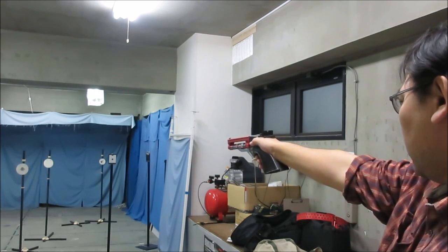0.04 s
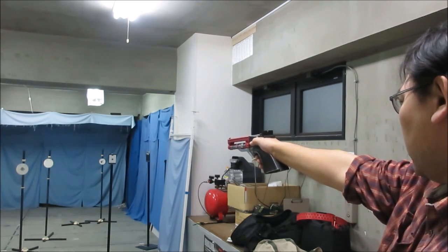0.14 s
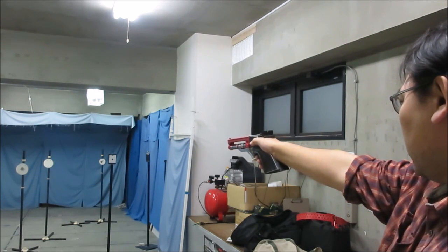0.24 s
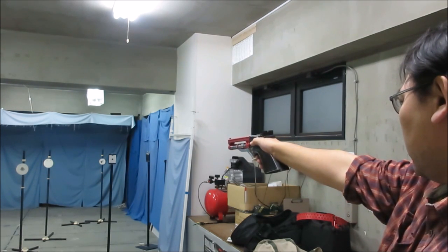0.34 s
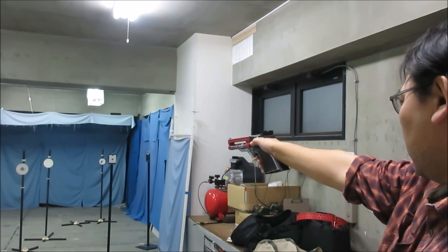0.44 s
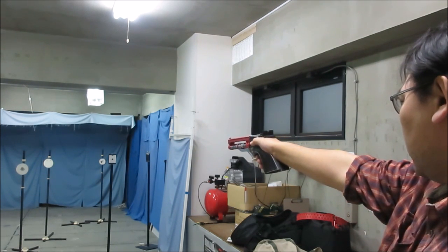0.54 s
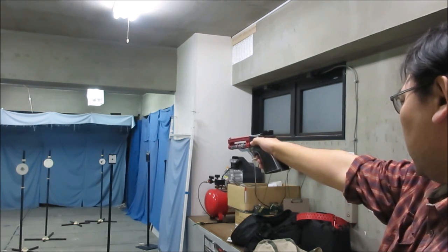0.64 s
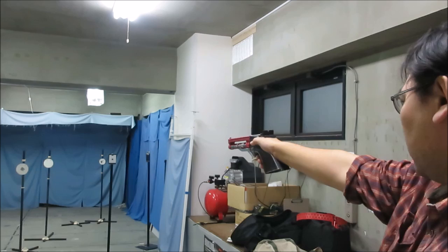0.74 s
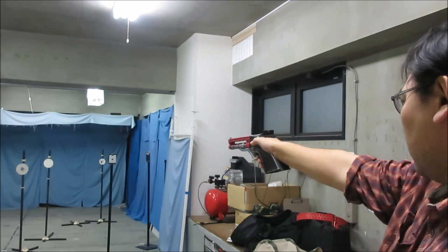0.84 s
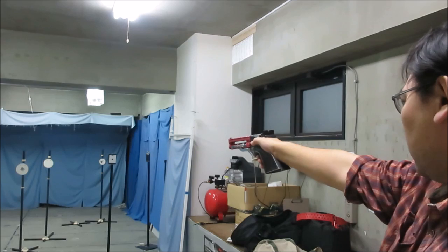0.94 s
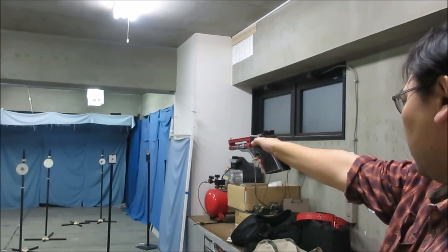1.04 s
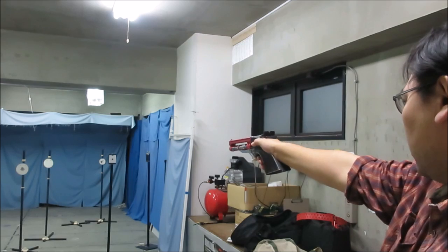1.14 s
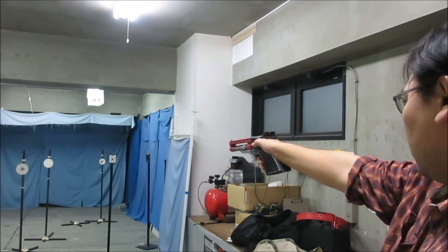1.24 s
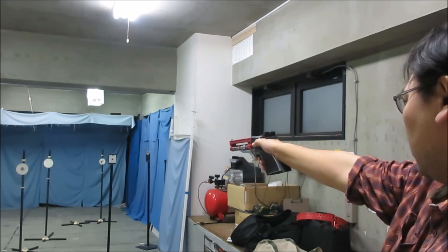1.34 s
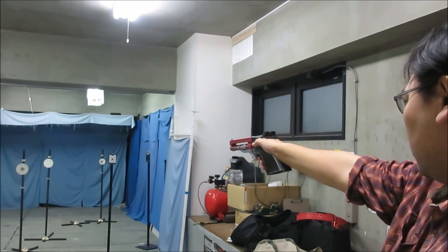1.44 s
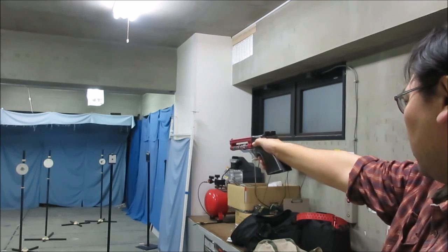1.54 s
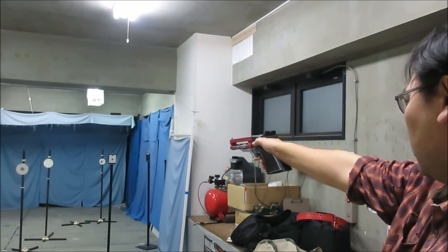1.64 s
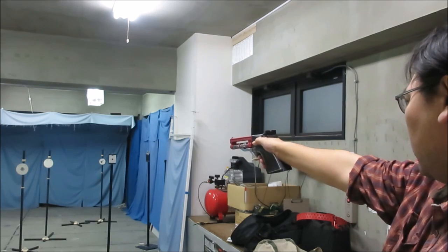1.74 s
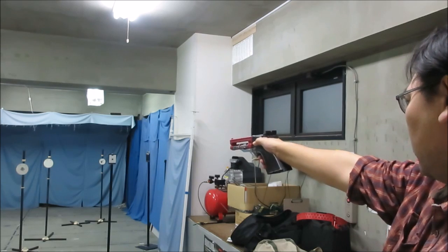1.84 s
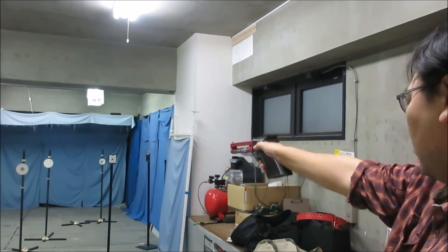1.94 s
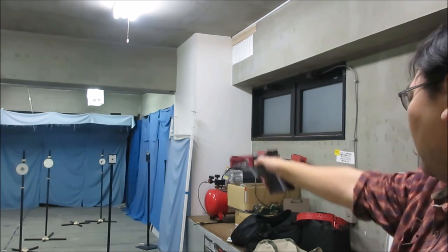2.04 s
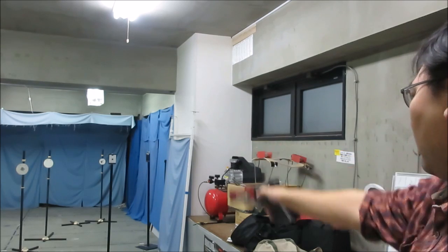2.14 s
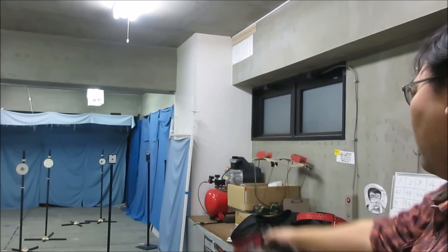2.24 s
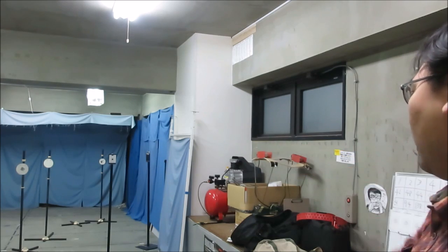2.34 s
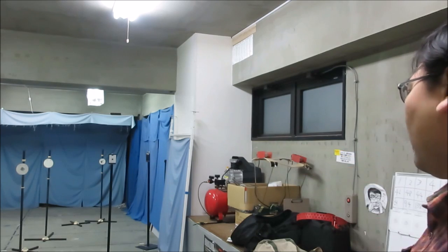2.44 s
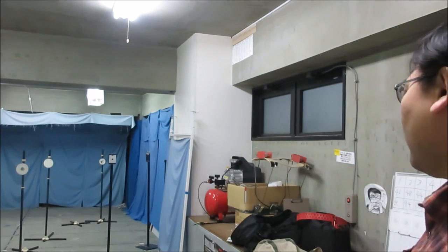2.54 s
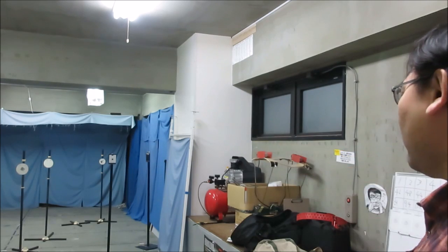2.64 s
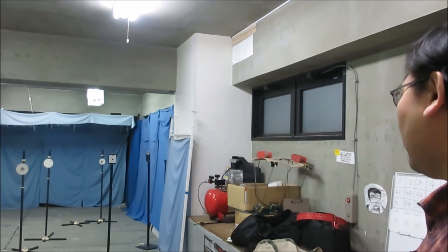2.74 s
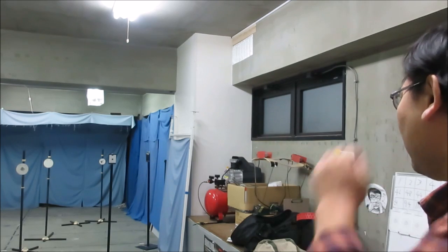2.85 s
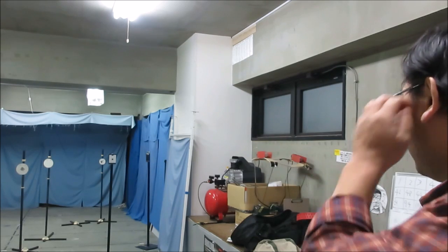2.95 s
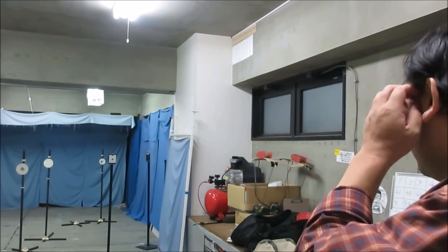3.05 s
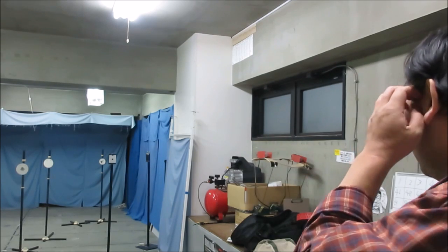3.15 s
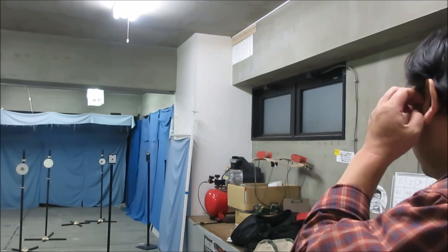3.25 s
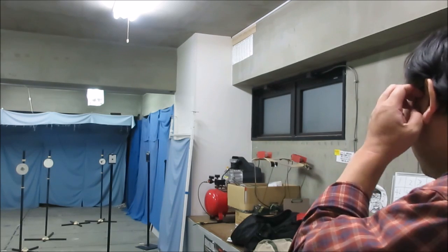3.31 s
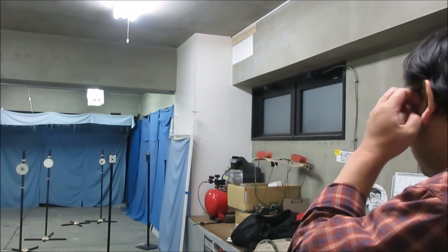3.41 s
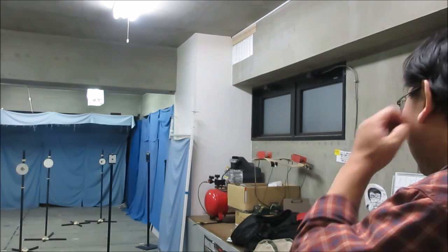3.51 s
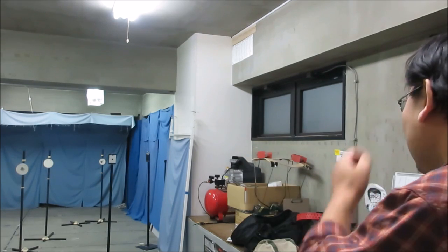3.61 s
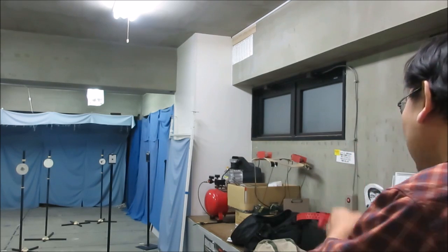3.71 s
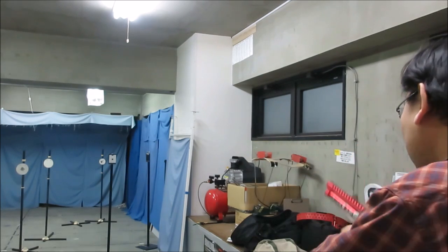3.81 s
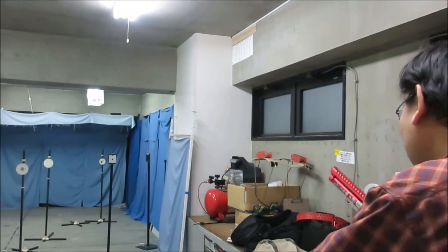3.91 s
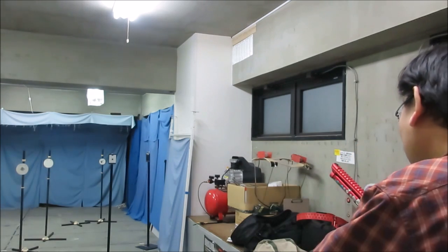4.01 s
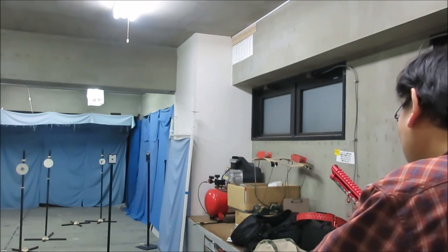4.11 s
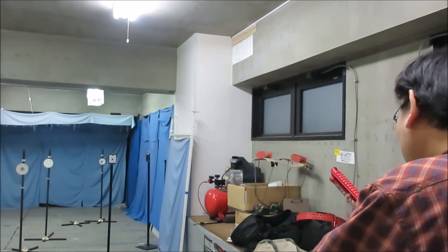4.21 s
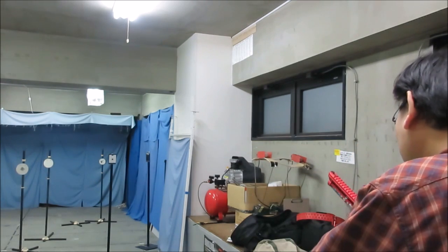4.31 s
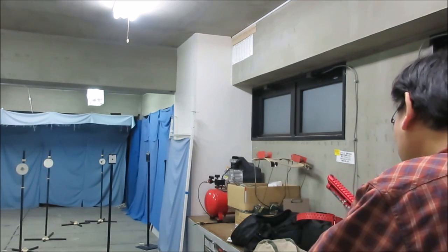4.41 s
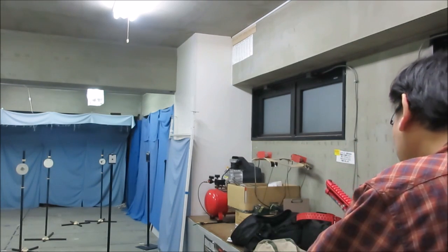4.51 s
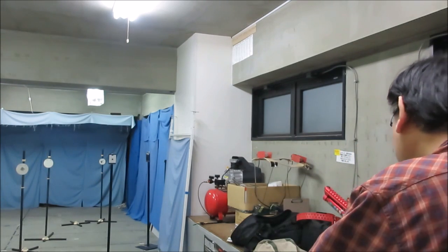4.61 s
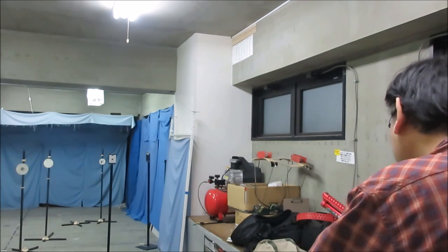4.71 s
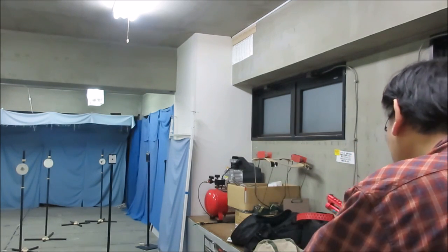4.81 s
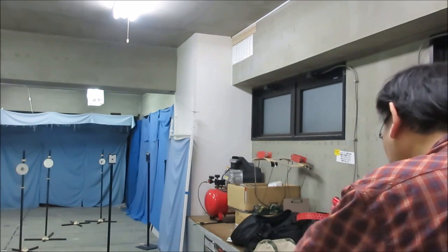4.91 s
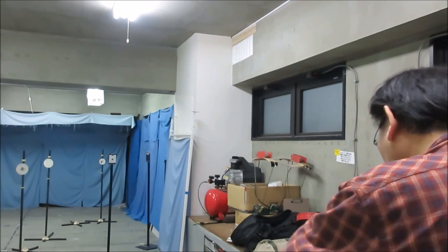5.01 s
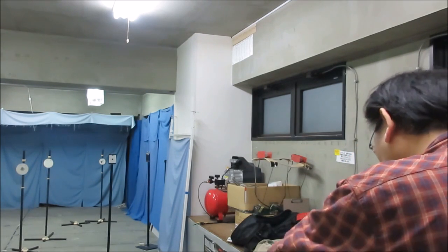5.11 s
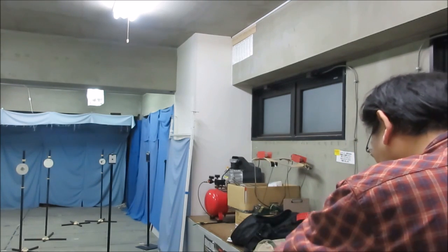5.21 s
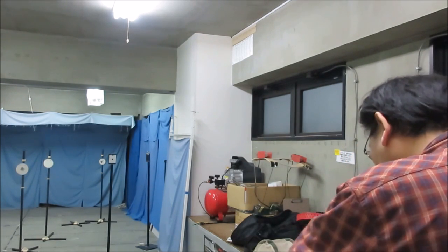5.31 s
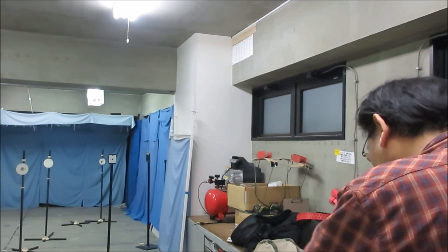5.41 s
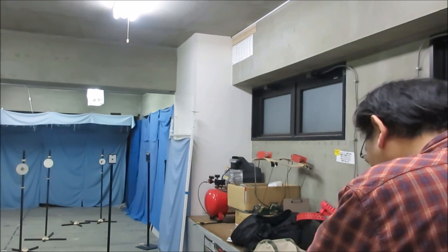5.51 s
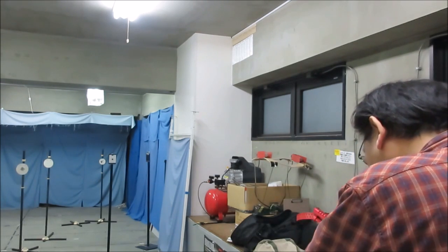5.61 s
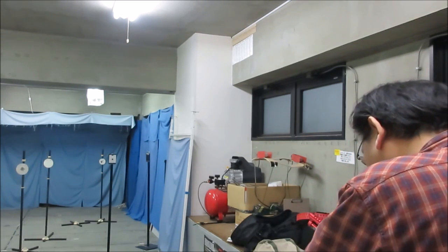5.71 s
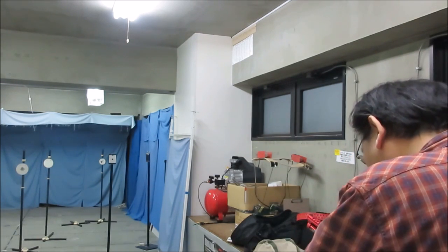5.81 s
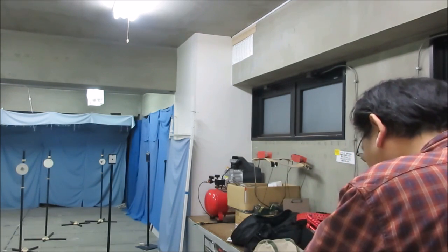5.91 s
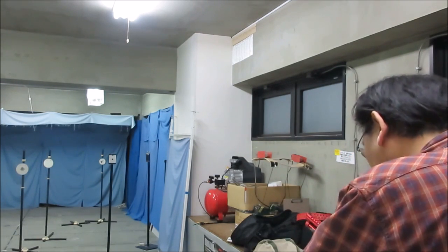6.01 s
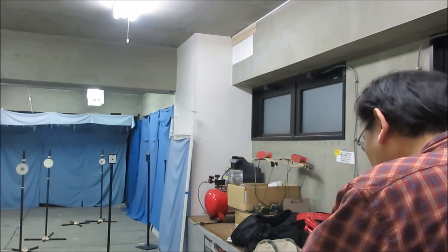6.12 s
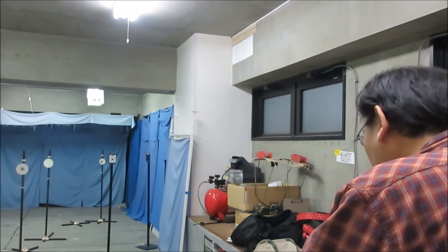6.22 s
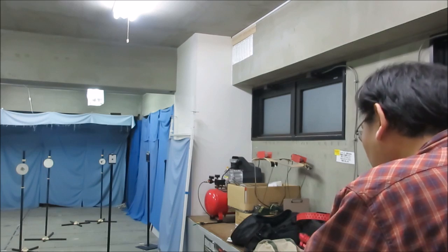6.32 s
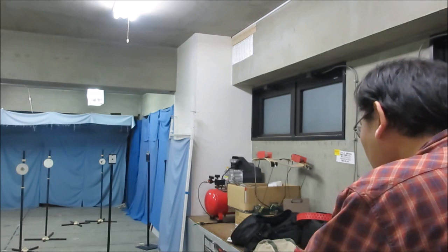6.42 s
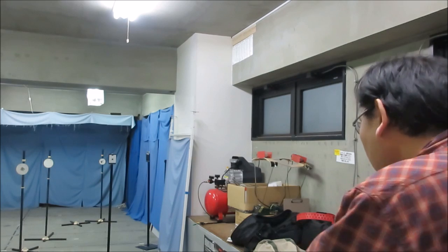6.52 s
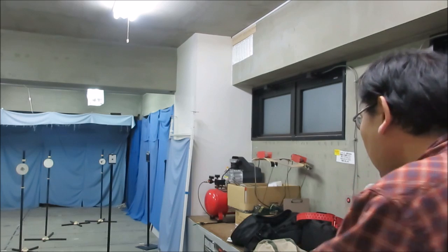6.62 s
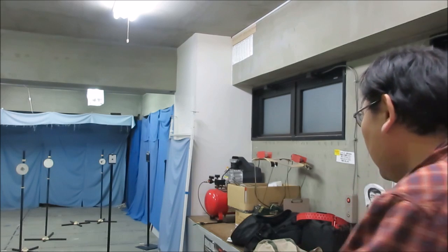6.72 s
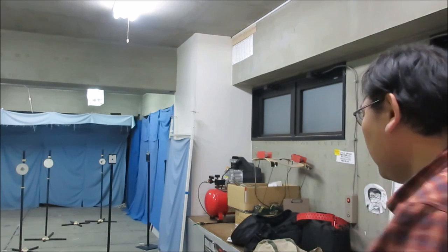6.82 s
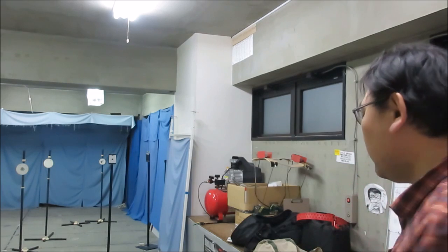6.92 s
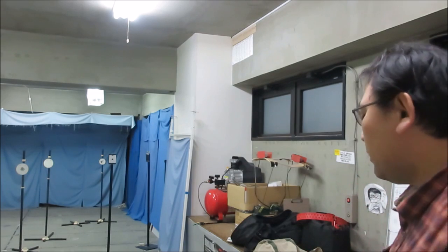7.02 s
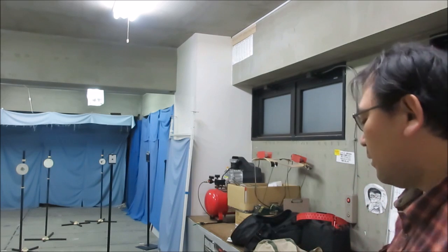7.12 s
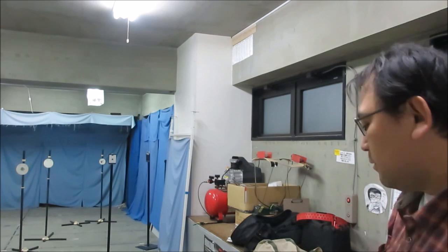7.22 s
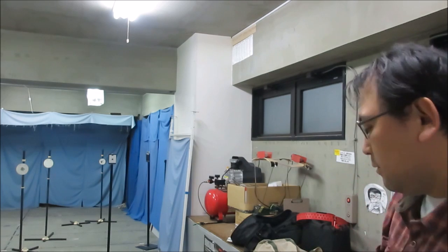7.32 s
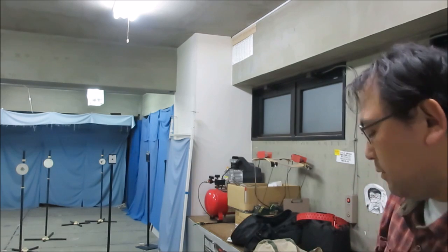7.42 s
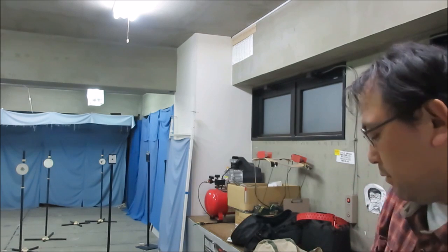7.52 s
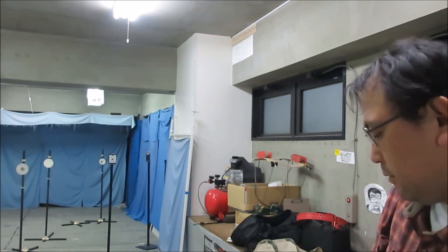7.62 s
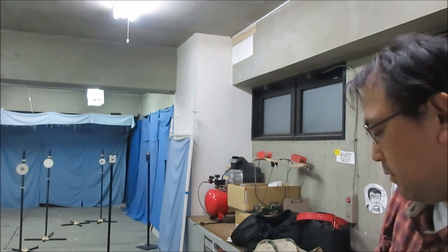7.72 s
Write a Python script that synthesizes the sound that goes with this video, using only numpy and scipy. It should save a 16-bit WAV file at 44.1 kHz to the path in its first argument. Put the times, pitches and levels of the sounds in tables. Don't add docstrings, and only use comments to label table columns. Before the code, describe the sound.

A low, slightly wavering ventilation hum with soft air noise fills a concrete indoor range. At about 1.04 seconds an air pistol fires right by the microphone: a dry, overloaded burst, followed at 1.12 by an even harder pellet crack on a steel plate, its clangy ring and room reflections fading within half a second. The background drops suddenly, then swells back over two seconds. Faint cloth moves at 2.2; the pistol lands on the bench with a dull knock at 2.39, then faint rings and ticks until 2.9. A low bench thump comes at 3.9. From 4.3 to 5.3, small bright clicks, scrapes and pings as the lever opens and a pellet is loaded. A heavy, bright double snap hits at 6.0, a click at 6.4 and a loud closing clack at 6.48. Soft sleeve rustle follows, with light knocks at 7.3 and 7.65.

```python
import sys
import numpy as np
from scipy import signal
from scipy.fft import rfft, irfft, next_fast_len
from scipy.io import wavfile
from scipy.ndimage import map_coordinates

SR = 44100
rng = np.random.default_rng(int(sys.argv[2]) if len(sys.argv) > 2 else 0)


def boost_factor(decibels):
    exponent = np.asarray(decibels, float) / 20
    return 10 ** exponent


def bounce(signal):
    frames = np.transpose(np.atleast_2d(signal))
    limited = np.clip(frames, -1, 1)
    pcm = np.round(limited * 32767).astype(np.int16)
    wavfile.write(sys.argv[1], SR, pcm)


N = 341775
ACTION_FRAME_DB = -1.5


def unit(x):
    return x / np.sqrt(np.mean(x ** 2) + 1e-20)


def along(points, hz):
    f, v = np.transpose(points)
    return np.interp(np.log(hz + 1), np.log(f + 1), v)


def wobble(rate_hz, count=N):
    knots = rng.standard_normal(size=800)
    return map_coordinates(knots, [np.arange(count) * rate_hz / SR], mode="wrap")


def filtered(x, response):
    m = next_fast_len(x.shape[-1] + 4096)
    spectrum = rfft(x, m) * response(np.fft.rfftfreq(m, 1 / SR))
    return irfft(spectrum, m)[..., :x.shape[-1]]


def resonance(f, hz, width_hz):
    return 1j * f * width_hz / (hz * hz - f * f + 1j * f * width_hz)


def camera_gain(t):
    rest_db, duck_s = -1.78, 0.014
    # start in seconds, depth in dB, recovery in seconds.
    ducks = [
        (1.041, 7.5, .17),
        (1.122, 18, 2.2),
        (2.39, 1.5, 1.6),
    ]
    loss_db = 0
    for s, depth_db, back_s in ducks:
        onset = np.clip((t - s) / duck_s, 0, 1)
        recovered = np.sin(np.pi / 2 * np.clip((t - s) / back_s, 0, 1)) ** 2
        loss_db = loss_db + depth_db * onset * (1 - recovered)
    return boost_factor(rest_db - loss_db)


def add(track, s, sound):
    part = track[:, round(s * SR):][:, :sound.shape[-1]]
    part += sound[..., :part.shape[-1]] / camera_gain(s)


def room(x, wet_db, walls_db=-7, average=None):
    # frequency in Hz, t60 in seconds.
    decay = [(150, 0.15), (500, 0.34), (1500, 0.47), (4000, .5), (9000, 0.36), (15000, 0.26)]
    # delay in seconds, level in dB.
    walls = [(.0035, 2), (.0055, 1.5), (.0085, -1), (0.0128, -3.5), (.018, -11.5), (.029, -6.5)]
    # frequency in Hz, side minus mid in dB.
    side_colour = [(110, -17.5), (380, -10), (700, -21.5), (1290, -27), (2380, -32), (4400, -17),
                   (8120, -8.5), (15000, -5)]
    hz, t, z = signal.stft(rng.standard_normal((2, SR * 2 // 3)), SR, nperseg=256)
    tail = signal.istft(z * boost_factor(-60 * t / along(decay, hz)[:, None]), SR, nperseg=256)[1]
    build_s = 0.0068
    tail *= 1 - np.exp(-(np.arange(tail.shape[1]) / SR / build_s) ** 2)
    tail *= boost_factor(wet_db) / np.linalg.norm(tail[0])
    early = np.zeros_like(tail)
    for s, db in walls:
        smear = rng.standard_normal((2, 64)) * boost_factor(-60 * np.arange(64) / SR / 0.0015)
        early[:, round(s * SR):][:, :64] += boost_factor(wet_db + walls_db + db) * smear / np.linalg.norm(smear[0])
    direct = signal.lfilter([0.8], [1, -0.35], np.eye(64)[0])
    early[:, :64] += direct * [[1], [1.5]]
    diffuse = x if average is None else average
    wet = signal.fftconvolve(x[None], early, axes=1) + signal.fftconvolve(diffuse[None], tail, axes=1)
    wet[1] = filtered(wet[1], lambda f: 1j * boost_factor(along(side_colour, f)))
    return wet


def contacts(rows, sharpness, snap_db, wet_db, walls_db, frame_db):
    # frequency in Hz, width in Hz, level in dB.
    small_parts = [(6400, 600, 0), (8900, 700, -3), (12200, 2300, -14.5)]
    # frequency in Hz, width in Hz, level in dB.
    frame_modes = [(2180, 180, -1), (2600, 160, -2.5), (2870, 21, -3.5), (3540, 72, -4), (4060, 120, -3.5),
                   (4370, 150, -2.5), (4940, 120, -3), (5583, 120, -2), (6300, 51, -1.5), (6640, 74, -2),
                   (7873, 200, -4.5), (8930, 170, -1)]
    out, t = np.zeros((2, N)), np.arange(SR // 10) / SR

    def steel(f):
        return sum(boost_factor(g) * resonance(f, c, w) for c, w, g in small_parts) + 1.2 * resonance(f, 5500, 6000)

    for s, db, hz, t60_s in rows:
        def part(f):
            low_pass = (1 + 1j * f / (6.0 * hz)) ** 2
            high_pass = 1j * f / (0.4 * hz + 1j * f)
            return resonance(f, hz, hz / sharpness) / low_pass * high_pass

        rattle = rng.standard_normal(len(t)) * boost_factor(-60 * t / np.clip(t60_s, 0.001, 0.1))
        rattle[0] = -min(4, 0.012 / t60_s)
        even = np.linalg.norm(rattle) * (t == 0)
        blows = np.array([rattle, even])
        body = filtered(blows, part)
        snap = filtered(blows, steel)
        struck = body / np.abs(body[0]).max() + boost_factor(snap_db) * snap / np.abs(snap[0]).max()
        stir_db = rng.normal(frame_db, 2.1, len(frame_modes))

        def frame(f):
            return 1 + sum(boost_factor(g + k) * resonance(f, c, w) for (c, w, g), k in zip(frame_modes, stir_db))

        blow, average = filtered(boost_factor(db) * struck, frame)
        add(out, s, room(blow, wet_db, walls_db, average))
    return out


def friction(strokes, colour, grain_db, wet_db, rise_s, depth_db):
    out = np.zeros((2, N))
    for s, hold_s, fall_s, db in strokes:
        t = np.arange(0, rise_s + hold_s + fall_s, 1 / SR)
        lumps = np.repeat(rng.exponential(size=SR // 64 + 1), 64)[:len(t)]
        grains = rng.standard_normal(SR)[:len(t)] * boost_factor(grain_db * np.minimum(lumps, 2.5))
        rub = unit(filtered(grains, lambda f: boost_factor(along(colour, f))))
        away = np.maximum(1 - t / rise_s, (t - rise_s - hold_s) / fall_s)
        stroke = boost_factor(-depth_db * np.clip(away, 0, 1))
        add(out, s, room(boost_factor(db) * stroke * rub, wet_db))
    return out


def ventilation():
    shaft_hz, air_db = 20.99, -47
    # shaft order, level in dB rms.
    orders = [(5, -62.5), (6, -48), (9, -61.5), (10, -53), (11, -51.5), (12, -59.5), (13, -63.5),
              (14, -53.5), (15, -57.5), (18, -62.5), (20, -61.5), (31, -75.5), (33.3, -66), (38, -67)]
    # frequency in Hz, level in dB per Hz.
    air_colour = [(14, -45), (30, -23), (48, -6.5), (75, -16), (100, -12.5), (150, -7), (178, -16),
                  (228, -7.5), (310, -7.5), (485, -18), (800, -16), (1500, -23), (6360, -38),
                  (13200, -45.5)]
    # frequency in Hz, side minus mid in dB.
    air_side = [(60, -19.5), (110, -22.5), (200, -8.5), (1290, -8.5), (2380, -11), (4400, -7), (8120, -9),
                (15000, -22.5)]
    turn = 2 * np.pi * np.cumsum(shaft_hz * (1 + 0.0011 * wobble(1.5))) / SR
    hum = np.zeros(N)
    for order, db in orders:
        phase = 2 * np.pi * rng.random()
        hum += np.sqrt(2) * boost_factor(db + 1.7 * wobble(6.7)) * np.sin(order * turn + phase)

    def duct(f):
        mid_db = along(air_colour, f)
        return boost_factor([mid_db, mid_db + along(air_side, f)])

    air = filtered(rng.standard_normal((2, N)), duct)
    return hum * [[1], [-0.02]] + boost_factor(air_db + 0.55 * wobble(3.8)) * air / np.std(air[0])


def sliding_parts():
    # start in seconds, hold in seconds, fall in seconds, level in dB.
    slides = [
        (1.03, .001, 0.0022, -38),
        (4.3, 0.071, .03, -60),
        (4.393, .01, .09, -38.5),
        (4.463, .003, 0.019, -32.5),
        (4.8, 0.011, 0.038, -36),
        (6.0, .008, .05, -22.5),
        (6.386, 0.071, 0.061, -45.5),
    ]
    # frequency in Hz, level in dB per Hz.
    slide_colour = [(470, -28.5), (800, -7.5), (1020, -14), (2210, -0.5), (3420, -4.5), (5580, -1.5),
                    (7000, -17), (7730, -13), (16000, -28.5)]
    return friction(slides, slide_colour, grain_db=5.5, wet_db=-3.5, rise_s=0.013, depth_db=28.5)


def muzzle_blast():
    # start in seconds, peak in dB, body resonance in Hz, rattle t60 in seconds.
    blast = [
        (1.0387, -12, 3300, .012),
        (1.0412, 5, 2400, .024),
        (1.0445, 2, 2400, .008),
        (1.048, 3, 4390, .007),
        (1.0543, -4, 4500, .0023),
    ]
    return contacts(blast, sharpness=1.2, snap_db=-13.0, wet_db=-6.5, walls_db=-10.0, frame_db=-7.5)


def boom():
    # start in seconds, peak in dB, body resonance in Hz, rattle t60 in seconds.
    booms = [
        (1.042, -10.5, 481.8, 0.0093),
        (1.0425, -4.5, 1450, 0.021),
        (1.1212, -14, 300, .016),
    ]
    return contacts(booms, sharpness=0.99, snap_db=-33.5, wet_db=4.5, walls_db=-9.5, frame_db=-8.5)


def pellet_impact():
    # start in seconds, peak in dB, body resonance in Hz, rattle t60 in seconds.
    impact = [
        (1.1208, 7, 2280, .018),
        (1.1335, -7.5, 1905, .008),
        (1.155, -18, 4000, .009),
    ]
    return contacts(impact, sharpness=0.85, snap_db=-12.0, wet_db=2.5, walls_db=-11.0, frame_db=-8)


def plate():
    beats_per_t60 = 65
    # frequency in Hz, level in dB, t60 in seconds.
    plate_modes = [(543.4, -22, .4), (726, -30.5, 0.69), (952, -24.5, 0.62), (1560, -15.5, 0.53),
                   (1686, -12.5, 0.63), (1800, 0, .22), (1910, -10.5, .58), (2090, -8.5, .45),
                   (2590, -10.5, .25), (2605, -31, 1.1), (3400, -14, 0.17), (4050, -13.5, .5),
                   (5090, -20, 0.69), (7200, -18, 0.26)]
    hit = (1.121, -9)
    out, t = np.zeros((2, N)), np.arange(SR) / SR
    ring = np.zeros(SR)
    for hz, db, t60_s in plate_modes:
        rate_hz = beats_per_t60 / t60_s
        cluster = wobble(rate_hz, count=SR) + 1j * wobble(rate_hz, count=SR)
        ring += boost_factor(db - 60 * t / t60_s) * np.real(cluster * np.exp(2j * np.pi * hz * t))
    add(out, hit[0], room(boost_factor(hit[1]) * ring, wet_db=-5.0, walls_db=-11.5))
    return out


def thuds():
    # start in seconds, level in dB, frequency in Hz, t60 in seconds, place (1 left, -1 right).
    pushes = [
        (1.1392, -15.5, 180, 0.01, 0.81),
        (1.14, -15, 130, 0.012, -1),
        (1.135, -23.5, 61, .05, -.3),
        (1.1215, -16, 510, 0.008, 1),
        (1.1222, -18, 1250, .005, .9),
        (1.128, -23, 350, 0.041, -1),
        (3.918, -28.5, 128, 0.29, 0.033),
        (7.652, -38, 560, 0.11, 0.09),
        (2.39, -37.5, 210, 0.076, 0.023),
    ]
    out, t = np.zeros((2, N)), np.arange(SR // 3) / SR
    for s, db, hz, t60_s, place in pushes:
        push = -t * hz / (1 + t * hz) * boost_factor(-60 * t / t60_s) * np.sin(2 * np.pi * hz * t)
        add(out, s, boost_factor(db) * push / np.abs(push).max() * [[1], [place]])
    return out


def cloth():
    # start in seconds, hold in seconds, fall in seconds, level in dB.
    rustles = [
        (2.2, 0.32, 0.37, -60.5),
        (2.75, 0.097, 0.28, -63.5),
        (6.7, 0.15, 0.51, -53.5),
        (7.2, 0.12, 0.6, -52),
        (7.5, 0.11, .05, -55),
    ]
    # frequency in Hz, level in dB per Hz.
    cloth_colour = [(300, 0.5), (600, 4), (1000, 1), (2000, -4), (4000, -12), (9000, -29)]
    return friction(rustles, cloth_colour, grain_db=2.0, wet_db=-8.0, rise_s=0.12, depth_db=18.5)


def bench_knocks():
    # start in seconds, peak in dB, body resonance in Hz, rattle t60 in seconds.
    knocks = [
        (2.249, -46.5, 1002, 0.022),
        (2.3872, -16.5, 885, 0.0024),
        (2.3875, -23.5, 400, 0.0094),
        (2.394, -23, 1680, 0.0062),
        (2.66, -53.5, 2070, 0.026),
        (6.98, -55.5, 698, .01),
        (7.322, -42, 1057, .01),
        (7.656, -35.5, 605, 0.0068),
    ]
    return contacts(knocks, sharpness=1.3, snap_db=-24, wet_db=4.2, walls_db=-12, frame_db=-15)


def ticks():
    # start in seconds, peak in dB, body resonance in Hz, rattle t60 in seconds.
    tick_rows = [
        (2.372, -43.5, 6970, 0.0034),
        (2.777, -50, 7000, .0023),
        (2.783, -47, 6980, .0025),
        (2.92, -45, 6940, .0016),
    ]
    return contacts(tick_rows, sharpness=1.3, snap_db=-4.5, wet_db=-5.0, walls_db=-8, frame_db=-9)


def thin_tubes():
    # start in seconds, peak in dB, pitch in Hz, rattle t60 in seconds.
    rings = [
        (2.572, -47.5, 895, .1),
        (2.598, -45, 908, 0.11),
        (4.906, -32.5, 2230, 0.022),
        (5.335, -41, 3450, .02),
        (5.74, -45.5, 2185, 0.021),
    ]
    return contacts(rings, sharpness=32, snap_db=-40, wet_db=-2.0, walls_db=-9.0, frame_db=-32)


def grip():
    # start in seconds, peak in dB, body resonance in Hz, rattle t60 in seconds.
    grip_rows = [(4.319, -40.5, 2950, .006), (4.495, -26, 6260, .01), (4.61, -37, 2850, .03),
                 (4.618, -31.5, 2850, 0.028), (4.808, -33, 2900, .02), (4.9022, -26.5, 1840, 0.0024),
                 (4.908, -30.5, 3920, 0.0052), (5.128, -25.5, 2600, 0.0038), (5.292, -38, 2600, .012),
                 (5.329, -26, 2000, 0.0062), (5.3277, -19, 3100, 0.002), (6.392, -31, 2300, 0.0049),
                 (6.487, -9.5, 1902, 0.0082)]
    return contacts(grip_rows, sharpness=2.5, snap_db=-16, wet_db=-0.34, walls_db=-5, frame_db=ACTION_FRAME_DB)


def lever():
    # start in seconds, peak in dB, body resonance in Hz, rattle t60 in seconds.
    lever_rows = [(4.34, -51, 5320, 0.0092), (4.381, -38, 2900, .004), (4.399, -40, 3000, .004),
                  (4.4052, -28, 3380, 0.0068), (4.457, -32, 2500, 0.0051), (4.4752, -24.5, 2900, .007),
                  (4.816, -26.5, 2700, 0.012), (4.822, -35.5, 6800, 0.016), (5.133, -26.5, 3020, 0.0074),
                  (6.0, -16.5, 2520, .009), (6.03, -12, 3550, .005), (6.438, -32, 5560, 0.0063),
                  (6.4817, -7, 1740, .0014)]
    return contacts(lever_rows, sharpness=1.77, snap_db=-4.5, wet_db=1.2, walls_db=-5.5, frame_db=ACTION_FRAME_DB)


def catch():
    # start in seconds, peak in dB, body resonance in Hz, rattle t60 in seconds.
    snaps = [
        (4.412, -34, 5500, .0054),
        (4.4795, -20.5, 4930, 0.026),
        (6.009, -8.5, 1170, .008),
        (6.0145, -11, 4100, 0.0109),
        (6.398, -28.5, 2310, 0.0077),
    ]
    return contacts(snaps, sharpness=1.3, snap_db=2.0, wet_db=-3.5, walls_db=-6, frame_db=ACTION_FRAME_DB)


def hollow_parts():
    # start in seconds, peak in dB, pitch in Hz, rattle t60 in seconds.
    hollows = [
        (4.481, -23, 8750, 0.011),
        (4.482, -24, 6450, 0.0092),
        (4.49, -29, 4530, .012),
        (4.823, -25.5, 6700, 0.013),
        (4.9023, -29, 2120, .005),
        (5.345, -39.5, 1045, 0.016),
        (5.329, -28, 3100, .004),
        (6.015, -16, 8900, 0.0076),
        (6.4865, -12, 1800, 0.0037),
        (6.489, -22, 6900, 0.018),
    ]
    return contacts(hollows, sharpness=10.86, snap_db=-31, wet_db=0.6, walls_db=-2.0, frame_db=-30)


def scene():
    shot = muzzle_blast() + boom() + pellet_impact() + plate() + thuds()
    handling = bench_knocks() + ticks() + thin_tubes() + grip() + lever() + catch() + hollow_parts()
    rubbing = sliding_parts() + cloth()
    mid, side = ventilation() + shot + handling + rubbing
    return np.array([mid + side, mid - side])


def roll_off(x):
    return signal.sosfilt(signal.butter(12, 15950, fs=SR, output="sos"), x)


def record(dry):
    clip_level, top_hz = 0.98, 16000
    # frequency in Hz, level in dB.
    microphone = [(7000, 0), (10000, -2.5), (13000, -4), (15500, -11), (16000, -24)]
    x = filtered(dry, lambda f: boost_factor(along(microphone, f)))
    x = x * camera_gain(np.arange(N) / SR)
    x = x / (1 + np.abs(x / clip_level) ** 8) ** (1 / 8)
    mix = filtered(x, lambda f: f < top_hz)
    return roll_off(mix)


dry = scene()
out = record(dry)
bounce(out)
```